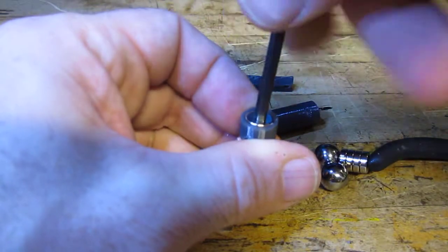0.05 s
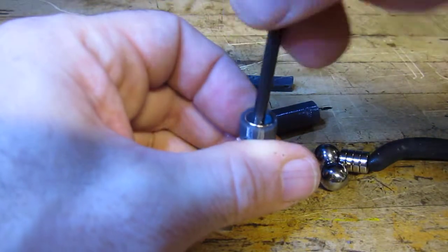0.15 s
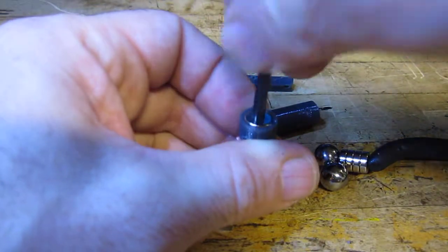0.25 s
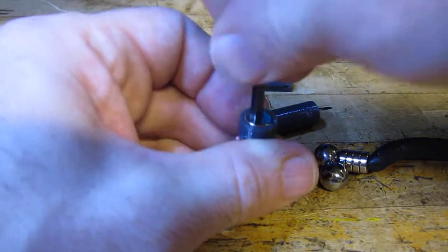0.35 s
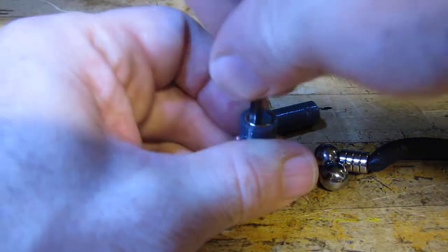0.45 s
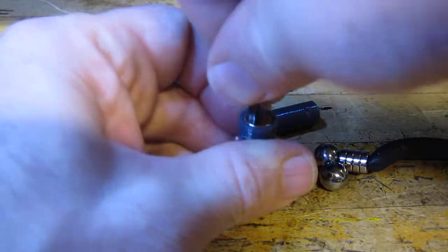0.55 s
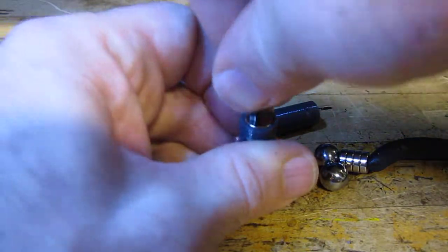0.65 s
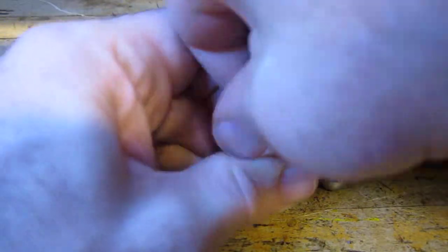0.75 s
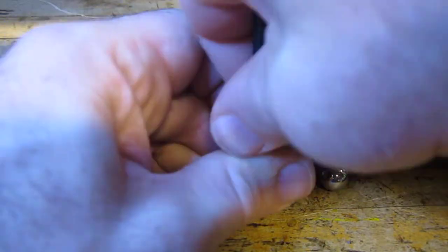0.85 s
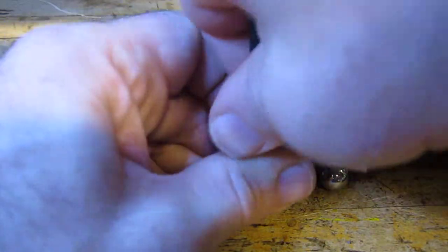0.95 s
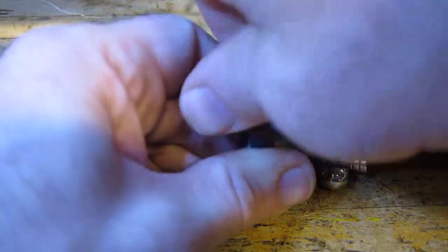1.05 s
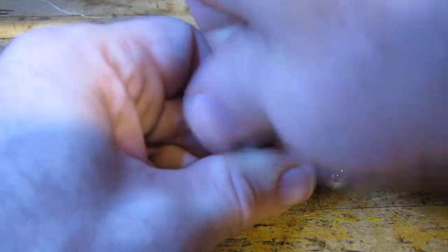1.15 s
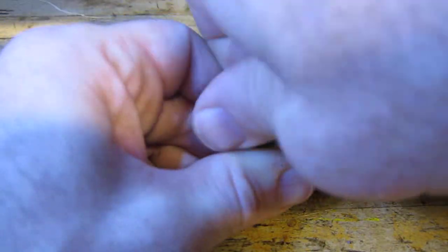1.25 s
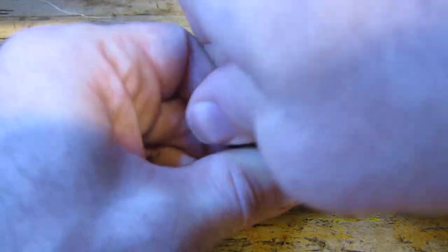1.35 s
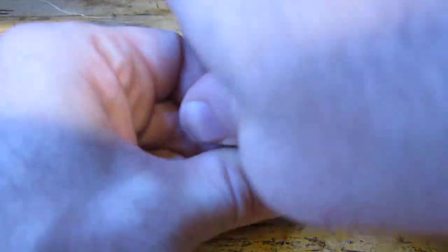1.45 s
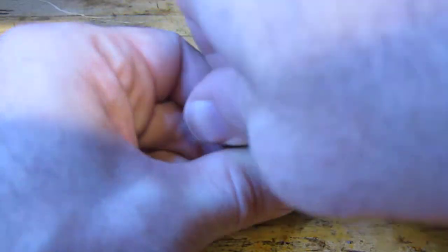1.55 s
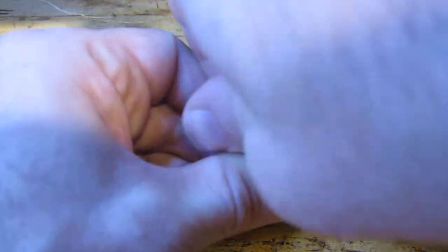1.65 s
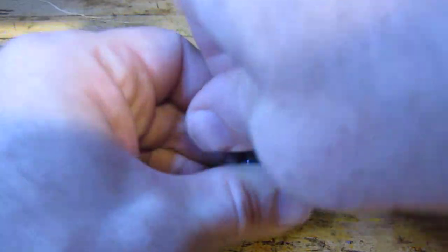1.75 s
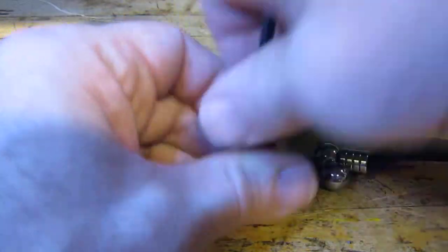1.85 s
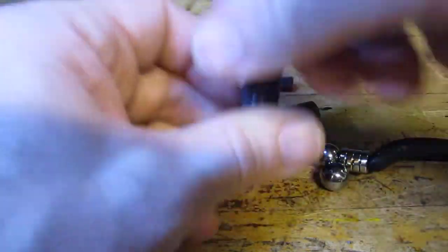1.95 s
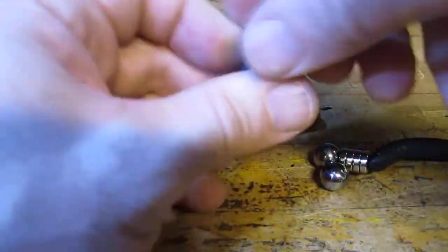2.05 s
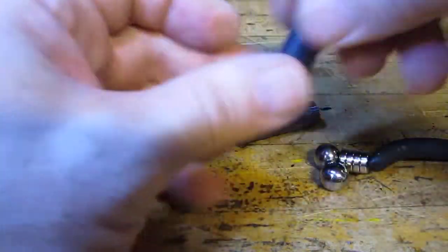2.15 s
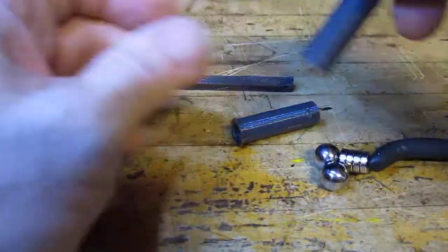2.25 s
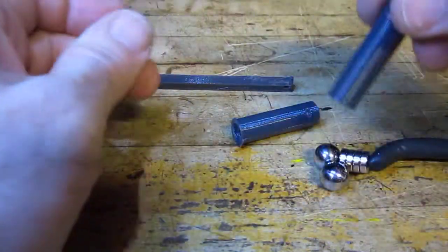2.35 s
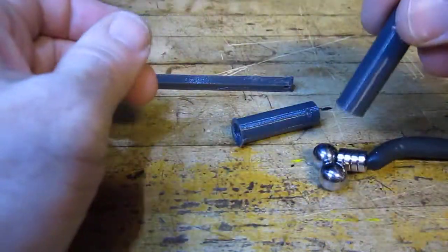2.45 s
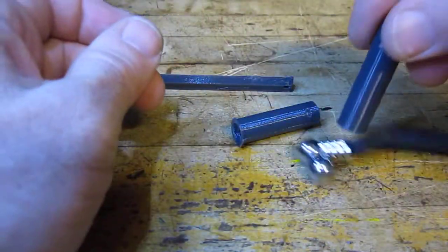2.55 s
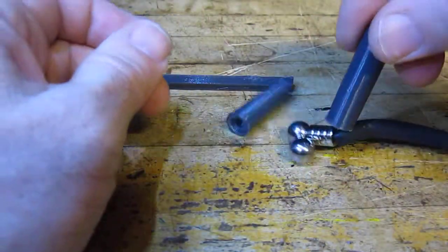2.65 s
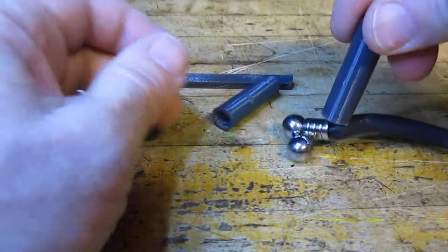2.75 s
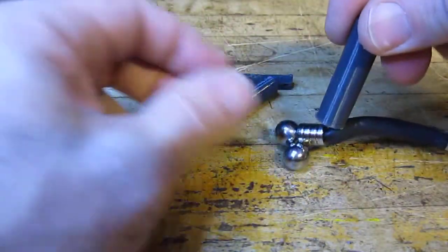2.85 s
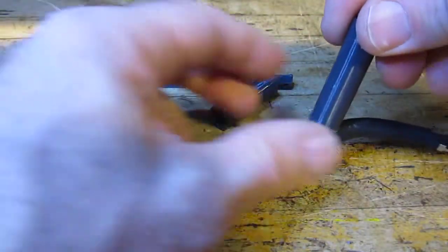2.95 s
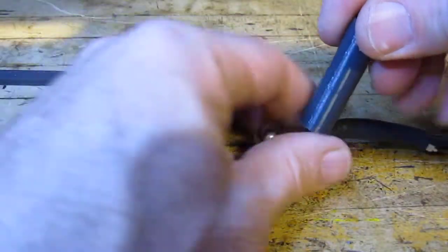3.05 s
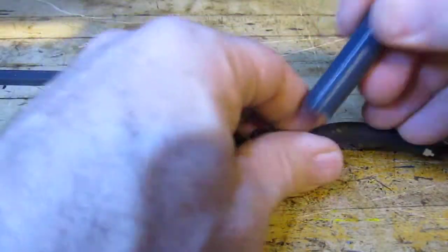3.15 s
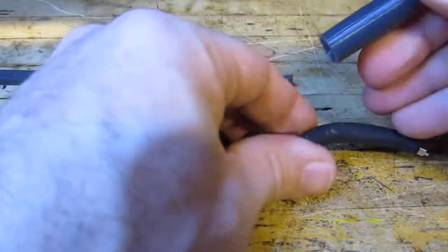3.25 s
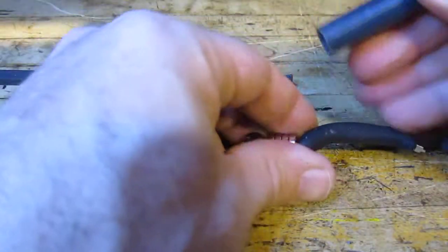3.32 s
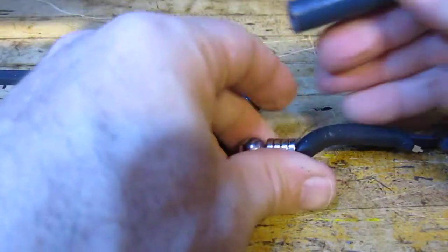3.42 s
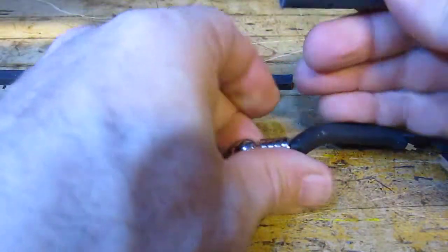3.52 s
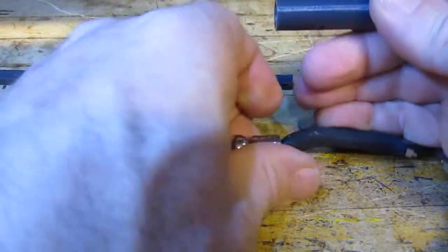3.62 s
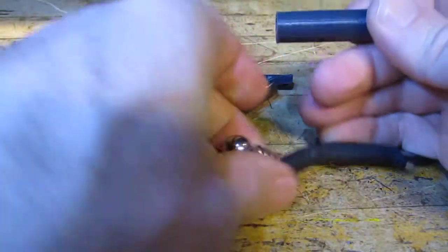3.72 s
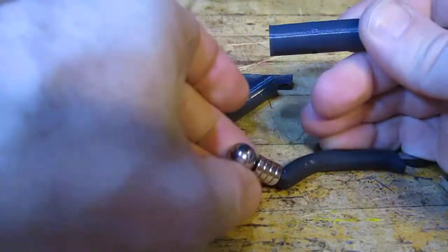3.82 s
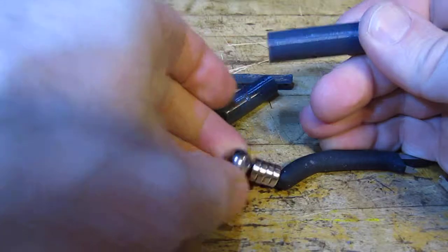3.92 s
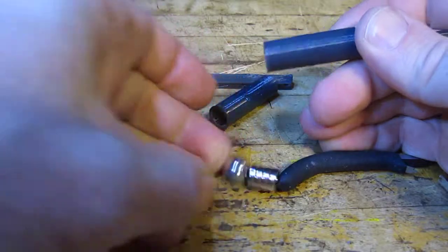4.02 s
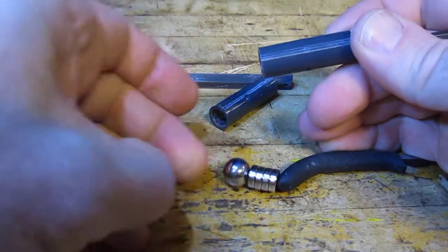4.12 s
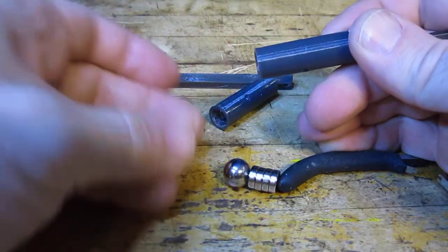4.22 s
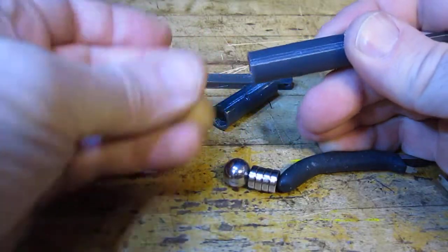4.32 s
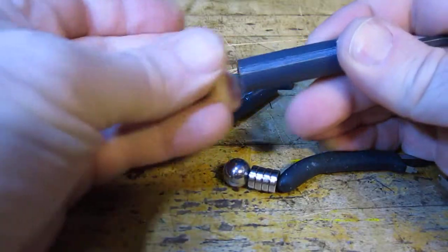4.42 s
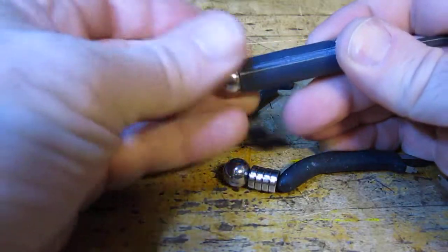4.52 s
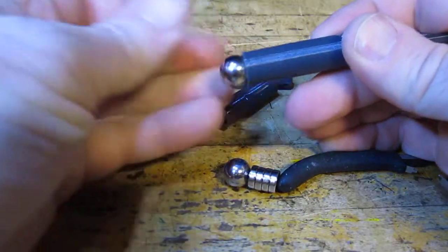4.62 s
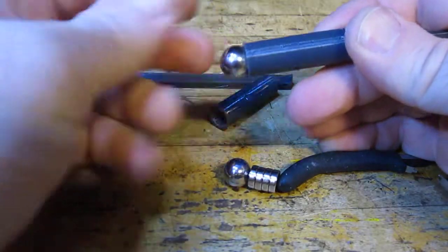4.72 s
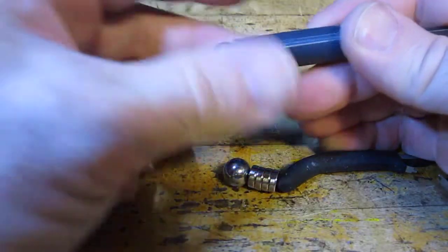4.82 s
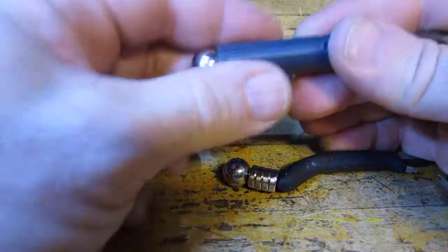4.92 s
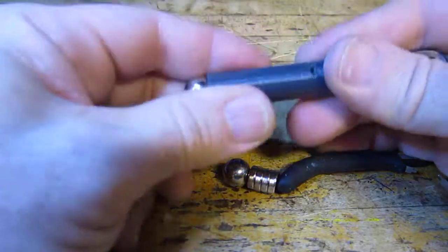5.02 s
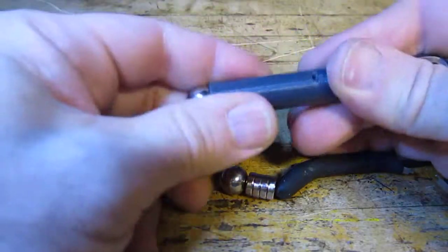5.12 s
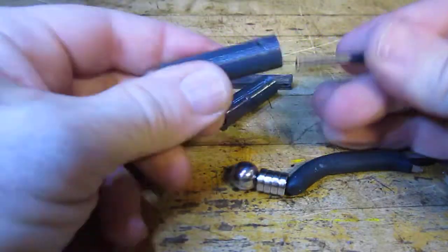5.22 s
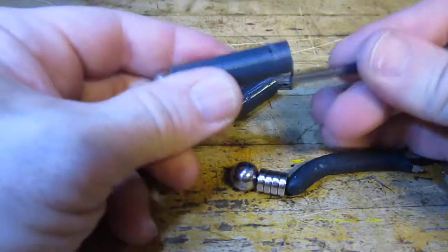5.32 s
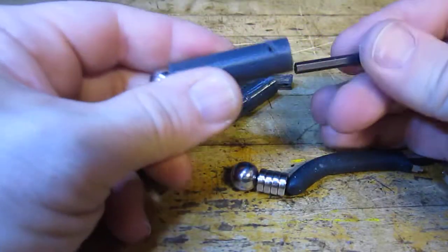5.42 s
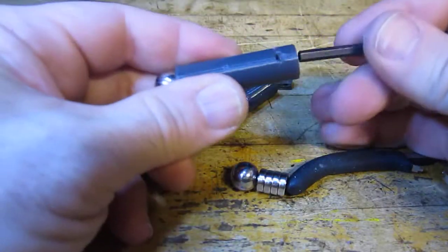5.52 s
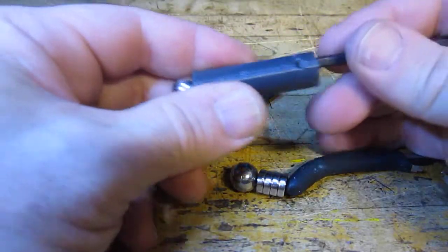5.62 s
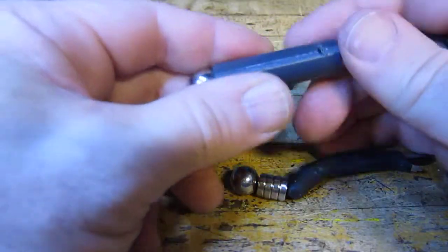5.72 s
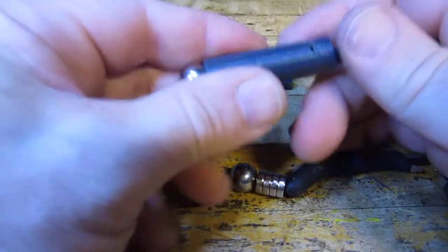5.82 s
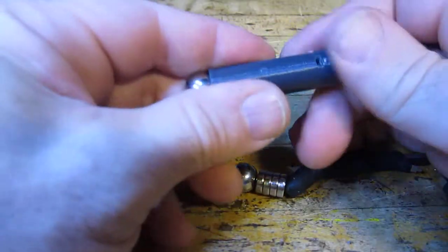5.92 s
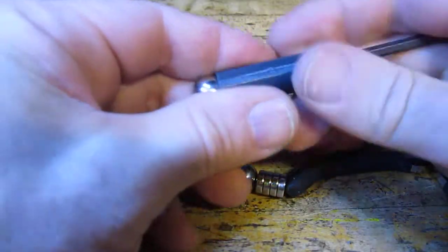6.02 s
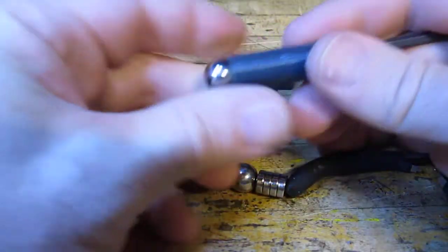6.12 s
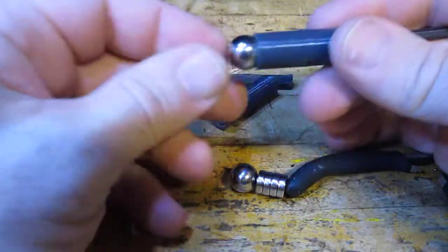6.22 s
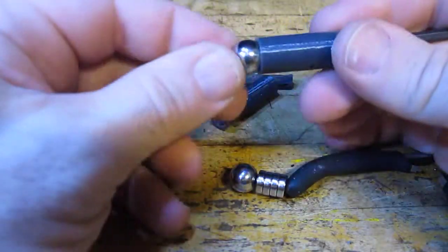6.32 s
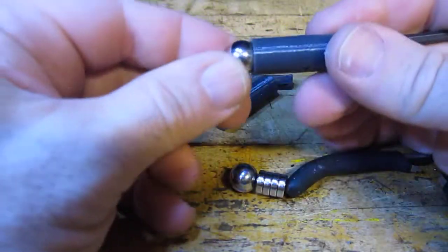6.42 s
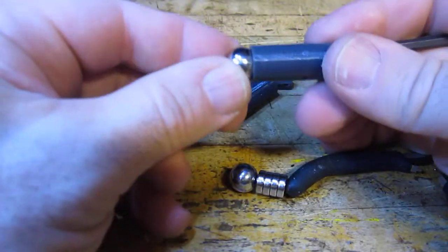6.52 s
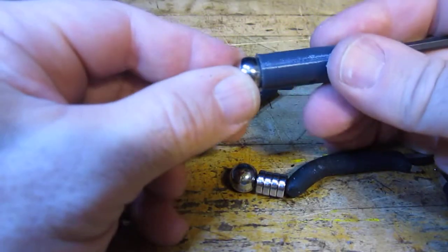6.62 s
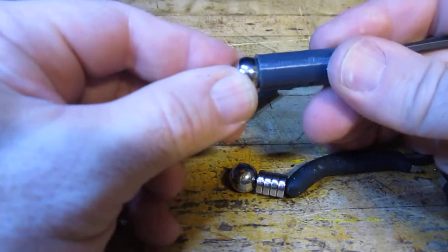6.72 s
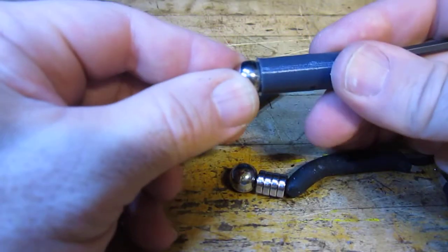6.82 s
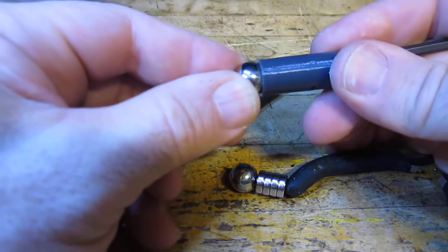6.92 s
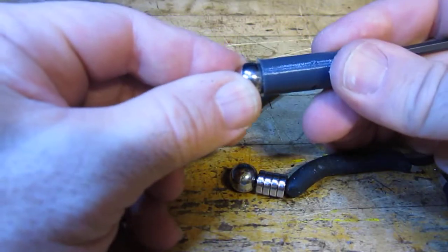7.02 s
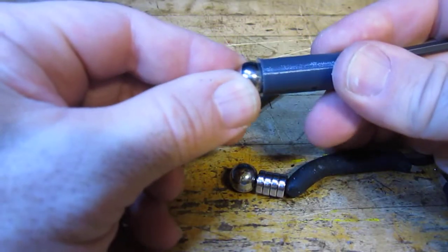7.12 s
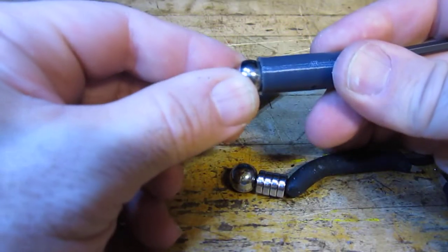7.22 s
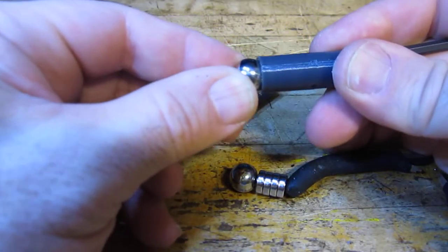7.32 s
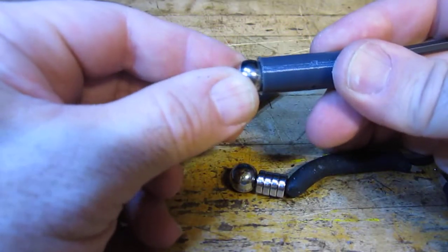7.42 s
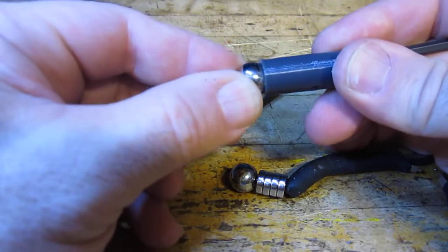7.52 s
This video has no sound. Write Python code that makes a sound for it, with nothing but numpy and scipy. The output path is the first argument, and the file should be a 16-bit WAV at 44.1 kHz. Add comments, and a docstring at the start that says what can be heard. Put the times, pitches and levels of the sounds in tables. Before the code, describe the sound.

Close-up handling of metal balls, a rod and plastic tubes: light clicks, bench knocks, faint skin rubs, and three loud metallic snaps in a humming room.

```python
"""Hands fit small magnets, steel balls, a rod and plastic tubes together on a wooden bench in a humming room.
Over noise and thin whines, skin rubs softly, parts tick and knock the bench, and a rod snaps into a collar.
Then more knocks and ringing magnets follow, and a ball snaps onto a tube. Last, the rod creaks through its
tube and snaps onto a ball before a few late ticks. Blows ring dying sine waves; cracks and rubs are shaped noise.
The snaps overload the recorder, whose gain control drops at once and creeps back."""
import sys
import numpy as np
from scipy import signal
from scipy.fft import rfft, irfft
from scipy.io import wavfile
from scipy.ndimage import uniform_filter1d

SR = 44100
rng = np.random.default_rng(int(sys.argv[2]) if len(sys.argv) > 2 else 0)


def dump_mix(stems):
    """Bounce the given channels to the path in sys.argv[1] as a 16-bit WAV at rate SR."""
    frames = np.atleast_2d(stems).T  # one column per channel
    limited = np.clip(frames, -1, 1)  # hard clip at full scale
    pcm = np.round(limited * 32767).astype(np.int16)
    wavfile.write(sys.argv[1], SR, pcm)


N = 333384  # length of the scene in samples

# Ways the steel rings in each snap. Each row: pitch in Hz, relative level in dB, time to fall 60 dB in seconds.
ROD_IN_COLLAR = [(1000, -19, .01), (2200, -12.5, 0.015), (2970, -8, 0.012), (3588, 2.5, 0.012),
                 (4690, -2.5, 0.018), (7200, -11, 0.008), (8590, -9, 0.0067), (9980, -3, 0.034),
                 (13100, -13, 0.008)]
BALL_ON_TUBE = [(544, -11, 0.0041), (2150, -15.5, 0.01), (3534, -2, 0.01), (4120, -1, 0.014),
                (5150, -4.5, 0.0074), (5810, 1, 0.0069), (7530, -6, 0.011), (8693, -2.5, 0.013),
                (11080, -6.5, 0.01), (13920, -10, 0.011)]
ROD_ON_BALL = [(2270, -19, 0.01), (3200, -18.5, 0.022), (5105, -9, 0.02), (6310, -6.5, 0.027),
               (7680, -4.5, 0.016), (8825, 1.5, 0.0203), (10040, -6.5, .02), (11340, -6.5, 0.024)]
# Magnets pulling steel home. Each row: start in seconds, ring level in dB, which modes ring,
# delay in seconds and level in dB of the echo off the bench top, crack level in dB.
SNAPS = [(0.9721, 7.8, ROD_IN_COLLAR, 0.00056, -15.5, 4.1), (4.4875, 5.5, BALL_ON_TUBE, .00115, -3.5, 4.7),
         (5.7008, 6.4, ROD_ON_BALL, .00068, -11, 6)]


def snaps():
    """A magnet pulls steel home; returns the rings, the cracks and their echoes off the bench top."""
    rings, cracks, echoes = np.zeros((3, N))
    for s, db, modes, delay, echo_db, crack_db in SNAPS:
        add(rings, s, gain_of(db) * ring(modes, 0.0041, 1.0))
        sharp = without_bass(crack(2.4, 0.02, rough=.08, low_hz=2550), hz=2040)
        add(cracks, s, gain_of(crack_db) * sharp)
        direct = (rings + cracks)[round(s * SR):][:2000]
        add(echoes, s + delay, gain_of(echo_db) * direct)
    return rings, cracks, echoes


# Hollow plastic tube. Each row: pitch in Hz, relative level in dB, time to fall 60 dB in seconds.
TUBE = [(1308, -6.5, 0.059), (1710, -2, 0.019), (2094, -0.5, 0.022), (2580, -5, 0.022)]
# Parts touching in the fingers. Each row: start in seconds, blow level in dB,
# brightness in dB of the upper modes, tube ring level in dB.
TICKS = [(0.3851, -31, 1, -34.5), (0.423, -36.5, -3, -44), (0.4606, -20.5, -1.5, -37),
         (0.602, -43.5, 13.5, -37.5), (0.669, -36, -2, -37), (0.7128, -4, 2, -31),
         (0.7243, -16.5, 0.5, -28), (0.911, -42, 1, -62), (0.97, -8.5, -2, -20.5), (1.1699, 1, -13, -38),
         (1.177, -1, -9.5, -5.5), (1.3138, -32.5, -19.5, -37), (1.4254, -24.5, 0, -28),
         (1.4307, -19.5, -18.5, -58.5), (1.5535, -32.5, 2.5, -59.5), (1.7048, -32, 6, -36),
         (1.8205, -35.5, -9, -37.5), (2.714, -31, -7, -38), (2.772, -31, -25, -46), (3.493, -56, 18, -67),
         (3.793, -22, -5.5, -65), (3.9187, -38, -5, -40.5), (4.0219, -34, 7, -37), (4.2206, -32, -12, -66),
         (4.2651, -39.5, 4, -64), (4.8195, -39, 6, -59), (4.8801, -45, 14, -58), (4.897, -54, 17.5, -65.5),
         (5.1476, -15, -9.5, -21), (5.3056, -25, -4, -38), (5.3201, -27.5, -35, -40),
         (5.6768, -14.5, 3, -19), (5.6832, -15.5, 10, -46.5), (5.6882, -18.5, 15, -49),
         (6.081, -37.5, 7, -64.5), (6.7571, -37, -10, -44)]
# Parts striking or bouncing on the bench top. Each row: start in seconds, blow level in dB,
# brightness in dB of the upper modes, bench ring level in dB, its lean in dB to the second mode.
KNOCKS = [(0.488, -21, 0.5, -39.5, 2), (0.5176, -20, 0.5, -32.5, 1), (0.659, -23.5, 4, -32.5, 4),
          (0.7007, -7.5, 7.5, -20, 7), (0.7044, -7.5, -12.5, -21, 10), (0.73, -16, -11, -28, 10),
          (0.9663, -27, 2.5, -41, -0.5), (1.1648, -4.5, -16, -22.5, 0), (2.578, -15, 6, -33, 0),
          (2.5879, -17, 3, -27, -2), (3.1466, -37.5, 13, -19.5, -6.5), (3.3892, -38, 3, -31, -5),
          (3.5889, -12.5, -6.5, -19.5, -6.5), (3.6335, -23, -7, -30, -5), (3.6723, -28.5, -19, -33, -3),
          (4.0414, -1, -18, -19, 8), (4.0609, -15, -27, -22.5, 13), (4.0736, -19, -31, -32, 5),
          (4.0897, -19.5, -26, -25.5, 6)]
# Dry taps with one pitch. Each row: start in seconds, level in dB, pitch in Hz,
# time to fall 60 dB in seconds, crack in dB relative to the tap, bench ring level in dB.
TAPS = [(0.2432, -28, 1410, 0.019, -9, -40), (0.521, -23, 1640, 0.0093, -4, -45.5),
        (0.8593, -15.5, 3350, 0.0055, -3.5, -37.5), (2.6170, 2, 3090, 0.0027, -11, -26.5),
        (2.6781, -7.5, 3300, 0.0036, -9.5, -32.5)]
TUBE_OVER_BENCH_DB = -7  # a knock rings the tube along with the bench
BENCH_OVER_TUBE_DB = -15.5  # a tick reaches the bench only through the resting hand


def clicks(parts_t60=.006, crack_t60=.017):
    """Ticks and knocks crack and ring parts, tube and bench; a tap rings one pitch, cracks and rings the bench."""
    out = np.zeros(N)
    blows = []
    for s, db, bright_db, tube_db in TICKS:
        blows.append((s, db, bright_db, tube_db, tube_db + BENCH_OVER_TUBE_DB, 0))
    for s, db, bright_db, bench_db, lean_db in KNOCKS:
        blows.append((s, db, bright_db, bench_db + TUBE_OVER_BENCH_DB, bench_db, lean_db))
    for s, db, bright_db, tube_db, bench_db, lean_db in blows:
        peak_db = db + max(bright_db, 0)
        add(out, s, gain_of(peak_db - 6) * ring(parts(bright_db, parts_t60), .02, 1))
        add(out, s, gain_of(peak_db - 1.5) * crack(bright_db, crack_t60, rough=.2))
        add(out, s, gain_of(tube_db) * ring(TUBE, 0.064, 1))
        add(out, s + .001, gain_of(bench_db) * ring(on_bench(lean_db), 0.015, 1.2))
    for s, db, hz, t60, crack_db, bench_db in TAPS:
        add(out, s, gain_of(db) * ring([(hz, 0, t60)], 0.018, 1))
        add(out, s, gain_of(db + crack_db) * crack(-7.0, crack_t60, rough=.3))
        add(out, s + 0.001, gain_of(bench_db) * ring(on_bench(5.3), 0.01, 1.3))
    return out


# Small steel and plastic parts. Each row: pitch in Hz, relative level in dB.
PARTS = [(2750, 1), (3400, 3.5), (4700, -6), (5400, 1), (6200, -6.5), (7250, 3.5), (8600, -2.5), (10200, 0),
         (11400, -5.5), (13500, -12)]


def parts(bright_db, t60, split_hz=6500):
    """Modes of the small parts; hard contacts lift the upper ones."""
    split_hz = split_hz + 100 * min(bright_db, 0)  # soft contacts lose their edge lower down
    return [(hz, db + bright_db * (hz > split_hz), t60) for hz, db in PARTS]


# Bench top. Each row: pitch in Hz, relative level in dB, time to fall 60 dB in seconds.
BENCH = [(409, -10.5, 0.15), (615, -4, 0.075), (771.3, 1.5, 0.075), (1168, -10.5, 0.055)]


def on_bench(lean_db):
    """Modes of the bench top as one spot excites them: it leans from the third mode to the second."""
    return [(hz, db + lean_db / 2 * ((k == 1) - (k == 2)), t60)
            for k, (hz, db, t60) in enumerate(BENCH)]


# Free steel that rings on after a blow. Each row: pitch in Hz, level in dB, time to fall 60 dB in seconds.
MAGNET_STACK = [(4370, -19, 0.026), (7260, -31, 0.059), (8300, 4, 0.015), (8520, -16, 0.085),
                (9250, -23, 0.14), (12500, -27, 0.08)]
COLLAR = [(2070, -9, .12), (3800, -2, 0.24), (4760, 0, .22), (8550, -13, .15), (9900, -14.5, .15)]
FREE_ROD = [(2150, -2, 0.1292), (4730, -4.5, .15), (9830, -1, 0.13)]
# When they ring. Each row: start in seconds, level in dB added to every mode, which modes ring.
RINGS = [(0.972, -17, COLLAR), (2.6164, -18.5, MAGNET_STACK), (2.6783, -20.5, MAGNET_STACK),
         (5.678, -27.5, FREE_ROD), (5.686, -24.5, FREE_ROD)]


def free_rings(steady=0.72):
    """Steel rings on while it rattles in the fingers, so each mode flutters and blurs by itself."""
    out = np.zeros(N)
    for s, db, modes in RINGS:
        for hz, mode_db, t60 in modes:
            tone = ring([(hz, 0, t60)], 0.005)
            noise = rng.standard_normal(SR // 2 + 9)
            smooth = uniform_filter1d(uniform_filter1d(noise, size=80), size=80)
            flutter = evened(smooth)[:len(tone)]
            loose = np.minimum(np.arange(len(tone)) / SR / 0.0036, 1)  # flutter sets in over 3.6 ms
            add(out, s, gain_of(db + mode_db) * tone * (1 + loose * (steady - 1 + flutter)))
    return out


# Rod and tube ringing together, with the rod deep inside or at the mouth.
# Each row: pitch in Hz, relative level in dB, time to fall 60 dB in seconds.
ROD_DEEP = [(1310, -4, .011), (1686, -1.5, 0.0092), (2200, -7.5, 0.0058), (3160, 2.5, 0.0041),
            (4600, -4.5, 0.00421), (5140, -1, 0.0059), (5950, -2, 0.00499), (8130, -0.5, 0.0076),
            (10200, 0.5, 0.0041), (11100, -8.5, .004), (12700, -18, 0.0042)]
ROD_AT_MOUTH = [(1544, -5.5, 0.009), (1950, -3, 0.00563), (3210, -1, 0.0052), (4130, 2.5, 0.003),
                (6420, -0.5, 0.0048), (7100, -3, 0.004), (8700, -8.5, .004), (9470, -2, 0.0052),
                (10700, -14, .004)]
# The rod creaking through its tube. Each row: start in seconds, length in seconds, first and last
# slips per second, first and last level in dB, unevenness of the timing in seconds, which modes ring.
CREAKS = [(5.178, 0.014, 2200, 1785, -10.5, -13, 0.00034, ROD_DEEP),
          (5.3249, .0175, 291.6, 435, -18.5, -16.5, 0.000038, ROD_AT_MOUTH),
          (5.641, 0.037, 472.6, 517.4, -9, -9, 0.00027, ROD_DEEP)]


def creaks():
    """Uneven stick-slip: each slip rings rod and tube; fast slips leave the low modes quiet."""
    out = np.zeros(N)
    for s, length, first_rate, last_rate, first_db, last_db, uneven_s, modes in CREAKS:
        along = np.linspace(0, 1, int(length * SR))
        turns = np.cumsum(first_rate + (last_rate - first_rate) * along) / SR
        slips = along[np.diff(np.floor(turns), prepend=-1) > 0]  # one slip per whole turn
        for at, (late, size) in zip(slips, rng.standard_normal((60, 2))):
            db = first_db + (last_db - first_db) * at + 2 * size
            slip = without_bass(ring(modes, .02, 2.5), hz=first_rate)
            add(out, s + at * length + uneven_s * late, gain_of(db) * slip)
    return out


# Hard parts scraping. Each row: start in seconds, length in seconds, level in dB, brightness in dB,
# change in level over the scrape in dB, tube ring in dB relative to the crack.
SCRAPES = [(0.708, 0.024, -27, -15, 1.5, -10), (1.16, 0.0086, -15, 5.5, -4, 0),
           (2.574, 0.092, -37, -19.5, -4.5, 6), (3.142, 0.067, -36, -29, -20, 13),
           (4.048, 0.097, -26.5, -26.5, -22.5, -6), (5.149, 0.026, -37.5, 4, 6.5, -10.5)]
CATCHES_PER_S = 2800


def scrapes():
    """Dense random catches of uneven size crack and ring parts and tube at three contact points."""
    out = np.zeros(N)
    for s, length, db, bright_db, fade_db, tube_db in SCRAPES:
        chance, size, place = rng.random((3, 8000))[:, :int(length * SR)]
        caught = chance < CATCHES_PER_S / SR
        sign = np.sign(chance * SR / CATCHES_PER_S - .5)
        catches = caught * gain_of(-14 * size) * sign
        level = gain_of(np.linspace(0, fade_db, len(size)) + db)
        faded = level * evened(catches)
        for point in range(3):
            body = crack(bright_db, .004, rough=0.7)
            add(body, 0, gain_of(-5.0) * ring(parts(bright_db, 0.0045), 0.077, 1.7))
            add(body, 0, gain_of(tube_db) * ring(TUBE, 0.051, 1.0))
            here = faded * (np.floor(3 * place) == point)
            add(out, s, np.convolve(here, body / np.linalg.norm(body)))
    return out


# The whole bench swaying. Each row: pitch in Hz, relative level in dB before the tilt,
# time to fall 60 dB in seconds before stretching.
LEGS = [(59, -12.5, 0.094), (105, -1, 0.14), (190.6, 1.5, 0.05), (253, 2, 0.018)]
# Hands and parts leaning on the bench, and at 5.7 s a short low thump along with the last snap. # Each row:
# start in seconds, level in dB, factor that stretches the ringing time, tilt in dB per octave.
THUDS = [(0.386, -34, 0.45, -5), (0.462, -30.5, 0.54, 3), (0.517, -27.5, 0.47, -5), (0.599, -30, 0.41, 4),
         (0.662, -28, 0.36, 7), (0.7, -21, 2.7, 9), (0.731, -26, 2.6, 4), (1.16, -21.5, 1.7, 7.5),
         (2.98, -38, 0.26, 18.5), (3.754, -28, 0.62, 36), (3.78, -31.5, 1.4, 10), (4.039, -32.5, 2.9, 21),
         (4.06, -30, 5.3, 13), (5.7, -11.5, 0.24, -21)]


def thuds():
    """Soft pushes sway the bench, each tilted toward its upper or lower modes; a short low thump joins the last
    snap."""
    out = np.zeros(N)
    for s, db, longer, tilt_db in THUDS:
        modes = [(hz, mode_db + tilt_db * np.log2(hz), t60 * longer) for hz, mode_db, t60 in LEGS]
        add(out, s, gain_of(db) * ring(modes, 0.024, 0.81))
    return out


# Skin sliding on skin and parts. Each row: start in seconds, length in seconds, level in dB, centre in Hz.
RUBS = [(0, 0.12, -59, 5950), (0.168, 0.1, -48.5, 7650), (0.264, 0.047, -52.5, 10700),
        (0.382, 0.029, -45.5, 9360), (0.743, 0.16, -63.5, 5880), (1.517, 0.14, -63.5, 8850),
        (1.777, 0.085, -58.5, 9080), (2.01, 0.093, -58.5, 10580), (2.848, 0.54, -65, 9440),
        (3.029, 0.075, -57.5, 10200), (3.302, 0.11, -60.5, 9080), (3.534, 0.27, -55, 7600),
        (3.728, 0.067, -53, 9740), (3.899, 0.082, -58.5, 8100), (4.096, 0.043, -56.5, 11000),
        (4.183, 0.04, -56.5, 10400), (4.961, 0.021, -57, 7000), (5.9, 0.06, -42.5, 7730),
        (6.057, 0.059, -61, 9900)]
RUB_REACH_HZ = 16660  # the band of a rub is as wide as the way from its centre up to here
# The rod turning in the hollow part. The one row: start in seconds, length in seconds, level in dB,
# centre in Hz, width in Hz.
HOLLOW_RUB = (.45, .24, -53, 1700, 400)


def rubs():
    """Sliding makes soft swells of grainy hiss: noise in a band, with a restless level."""
    out, hz = np.zeros(N), np.fft.rfftfreq(16384, 1 / SR)
    skin = [(*row, RUB_REACH_HZ - row[-1]) for row in RUBS]
    for s, length, db, centre_hz, width_hz in skin + [HOLLOW_RUB]:
        noise, grain = rng.standard_normal((2, 16384))
        band = np.exp(-2 * ((hz - centre_hz) / width_hz) ** 2)
        hiss = evened(irfft(rfft(noise) * band))
        grain_db = 2 * evened(uniform_filter1d(grain, size=150))
        hiss = (hiss * gain_of(grain_db))[:int(length * SR)]
        add(out, s, gain_of(db) * hiss * signal.windows.tukey(len(hiss), .6))
    return out


# Machines in the room. Each row: frequency in Hz, relative level in dB per Hz.
HUM = [(25, -13), (114, -11), (220, -7), (330, -9), (400, -4), (520, -6.5), (680, -12.5), (787, -8.5),
       (1030, -15), (3000, -22), (8000, -31), (13600, -37.5), (16500, -41.5)]
# Narrow peaks of the hum. Each row: frequency in Hz, width in Hz, height in dB.
HUM_PEAKS = [(119.5, 6, 10), (187, 7, 13.5), (240.5, 5, 13), (270, 6, 15), (307.5, 5, 14), (538.5, 5, 11),
             (635.5, 3.5, 17), (809, 5, 10), (1167, 4, 11), (1860, 20, 7.5)]
HUM_DB = -47.5


def hum():
    """Steady noise with narrow wavering peaks and a slight swell in level."""
    hz = np.fft.rfftfreq(N, 1 / SR)
    peaks = sum((gain_of(2 * db) - 1) / (1 + (2 * (hz - f) / width) ** 4) for f, width, db in HUM_PEAKS)
    colour = gain_of(read(HUM, hz)) * np.sqrt(1 + np.maximum(peaks, 0))
    noise = irfft(rfft(rng.standard_normal(N)) * colour, N)
    swell = evened(uniform_filter1d(rng.standard_normal(N), size=6000))
    return gain_of(HUM_DB + .5 * swell) * evened(noise)


# Steady electrical tones. Each row: pitch in Hz, rms level in dB.
WHINES = [(7854, -76), (7881, -77), (13378, -85)]


def whine():
    """Thin steady sine tones; the close pair beats."""
    t = np.arange(N) / SR
    return sum(np.sqrt(2) * gain_of(db) * np.sin(2 * np.pi * (hz * t + rng.random())) for hz, db in WHINES)


# How fast the room dies away. Each row: frequency in Hz, time to fall 60 dB in seconds.
ROOM = [(300, 0.069), (1300, 0.28), (3500, 0.24), (9000, .23), (15000, 0.15)]


def room(x, gap=410, wall=.35):
    """One echo off the nearest wall, then sparse taps of random sign, each band dying at its own speed."""
    slots = np.arange(0, SR // 2, 20)
    taps = np.zeros(SR // 2 + 20)
    taps[slots + rng.integers(0, 20, len(slots))] = rng.choice([-1., 1.], len(slots))
    hz, t, bands = signal.stft(taps, SR, nperseg=256)
    decay = gain_of(-60 * t / read(ROOM, hz)[:, None])
    tail = signal.istft(bands * decay, SR, nperseg=256)[1]
    # gap: samples of silence before the wall echo
    tail = np.concatenate([np.zeros(int(gap)), [wall], tail / np.linalg.norm(tail)])
    return signal.fftconvolve(x, tail)[:N]


def ring(modes, detune=0., scatter_db=0.):
    """One blow on dying modes; a new contact point shifts and reweights them."""
    hz, db, t60 = np.transpose(modes)[:, :, None]
    shift, weight = rng.standard_normal((2, len(modes), 1))
    t = np.arange(int(SR * min(abs(t60).max(), .5)) + 9) / SR
    heights = gain_of(db + scatter_db * weight) / np.sqrt(np.sum(gain_of(2 * db)))
    decay = gain_of(-60 * t / abs(t60))
    tones = np.sin(2 * np.pi * hz * (1 + detune * shift) * t)
    return np.sum(heights * decay * tones, axis=0)


def crack(bright_db, t60, rough=.5, split_hz=6500, low_hz=1800, top_hz=9500):
    """Too many modes to tell apart: a sharp tick and dying noise, tilted by the hardness of the contact."""
    hz = np.fft.rfftfreq(1024, 1 / SR)
    split_hz = split_hz + 100 * min(bright_db, 0)  # soft contacts lose their edge lower down
    tilt = gain_of(bright_db / (1 + (split_hz / (hz + 1)) ** 6))
    colour = tilt / np.sqrt((1 + (low_hz / (hz + 1)) ** 4) * (1 + (hz / top_hz) ** 6))
    decay = gain_of(-60 * np.arange(1024) / SR / abs(t60))
    burst = rough * rng.standard_normal(1024) * decay
    burst[0] = 1  # the sharp tick
    coloured = np.roll(irfft(rfft(burst) * colour), 12)[:900]
    return coloured / abs(coloured).max()


def without_bass(x, hz):
    """Small bodies radiate nothing far below their lowest mode."""
    return signal.sosfilt(signal.butter(2, hz, "high", fs=SR, output="sos"), x)


def gain_of(db):
    """Decibels to a factor."""
    return 10 ** (np.asarray(db) / 20)


def evened(x):
    """Scales to rms 1."""
    return x / np.sqrt(np.mean(x ** 2) + 1e-20)


def read(points, hz):
    """Reads a curve on a log-frequency axis."""
    f, value = np.transpose(points)
    return np.interp(np.log(hz + 1), np.log(f + 1), value)


def add(mix, s, sound):
    """Mixes a sound in at s seconds."""
    part = mix[round(s * SR):][:len(sound)]
    part += sound[:len(part)]


def scene():
    """Handling sounds, their room tail and the background; snaps feed the room more than other sounds do."""
    rings, cracks, echoes = snaps()
    near = without_bass(clicks() + free_rings(), hz=356.0)
    near = near + without_bass(creaks() + scrapes(), hz=1050) + rubs()
    tail = room(gain_of(-19) * near + gain_of(-13) * rings) + gain_of(-2) * room(cracks)
    handling = near + rings + cracks + echoes + tail + without_bass(thuds(), hz=40)
    return (handling + hum() + whine())[None]


EDGE_HZ = 16500  # the recorder passes almost nothing above this


def record(dry, limit_db=-15.0, share=1.798, recovery_s=0.97, attack_s=0.0047, ceiling=0.72):
    """Gain control falls within milliseconds and recovers slowly; what gets through first is clipped."""
    span = round(.003 * SR)
    power = abs(signal.lfilter(np.ones(span) / span, 1, dry[0] ** 2))
    power_db = 10 * np.log10(power + 1e-12)
    over_db = share * np.maximum(power_db - limit_db, 1e-6)
    leak = np.arange(N) / SR / recovery_s
    held_db = np.exp(np.maximum.accumulate(np.log(over_db) + leak) - leak)  # exponential release
    ramp = np.ones(max(int(attack_s * SR), 2))
    # the gain slides down in a straight line
    gain = signal.oaconvolve(gain_of(-held_db) - 1, ramp / ramp.sum())[:N] + 1
    clipped = np.clip(dry * gain, -ceiling, ceiling)
    drooped = signal.sosfilt(signal.butter(2, 15000, fs=SR, output="sos"), clipped)  # dulls the top octave
    edge = signal.firwin(511, EDGE_HZ, window=("kaiser", 9), fs=SR)
    return signal.oaconvolve(drooped, edge[None], "same")


dry = scene()
out = record(dry)
dump_mix(out)
```